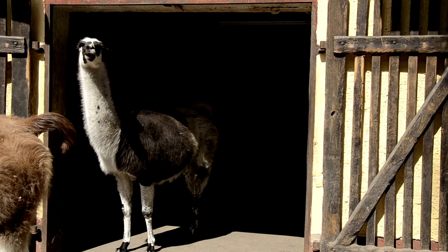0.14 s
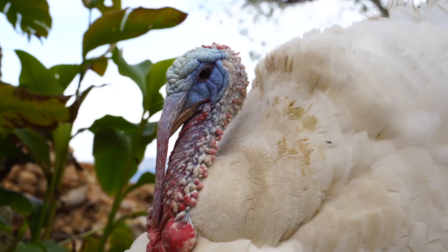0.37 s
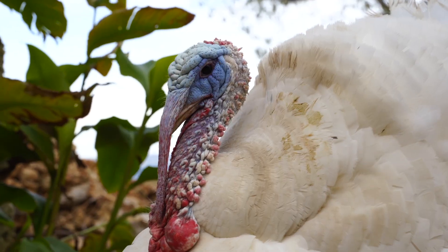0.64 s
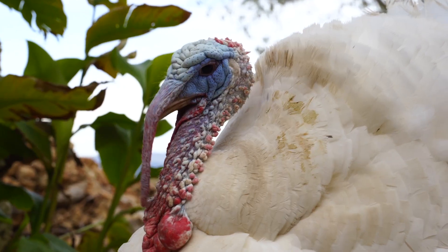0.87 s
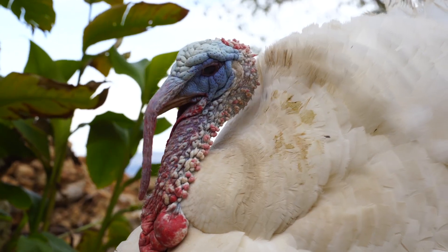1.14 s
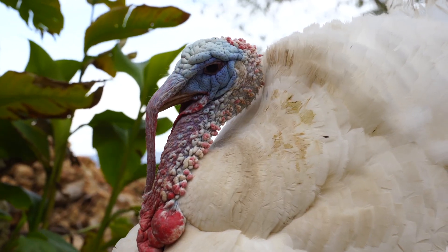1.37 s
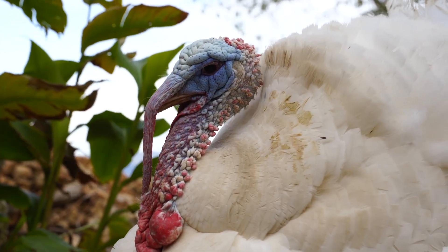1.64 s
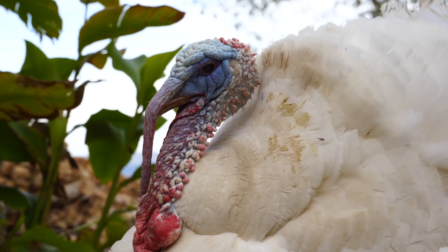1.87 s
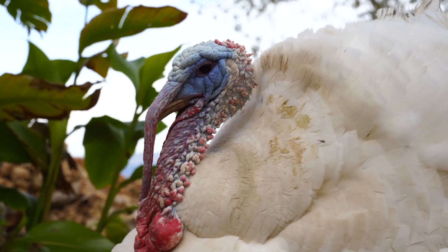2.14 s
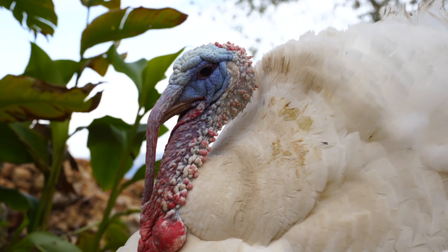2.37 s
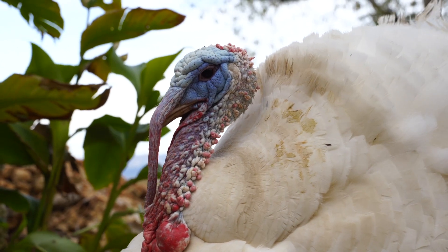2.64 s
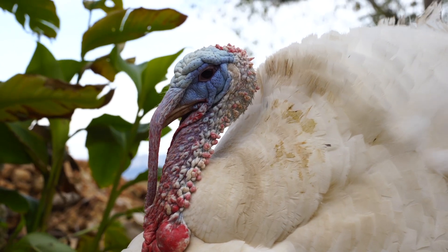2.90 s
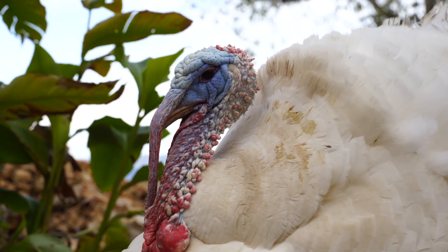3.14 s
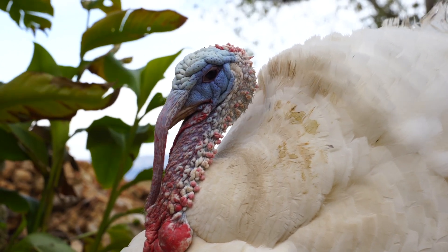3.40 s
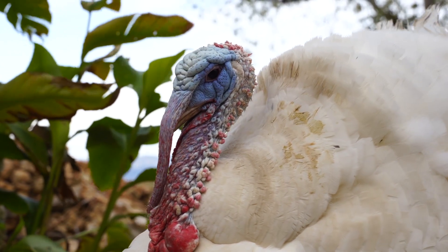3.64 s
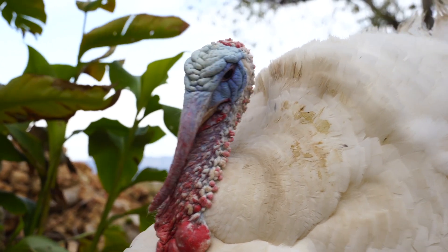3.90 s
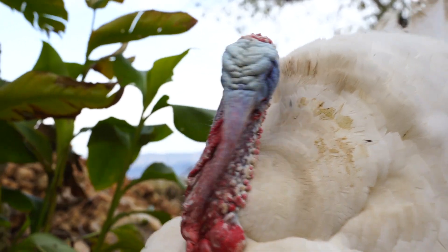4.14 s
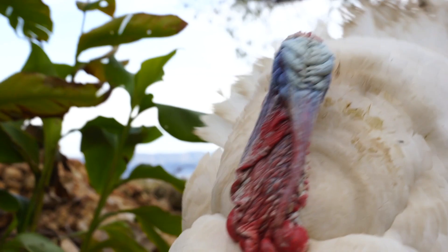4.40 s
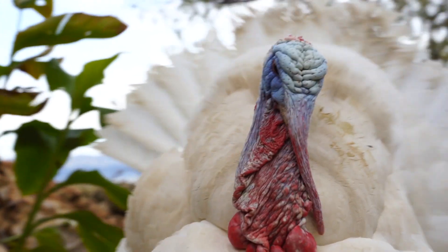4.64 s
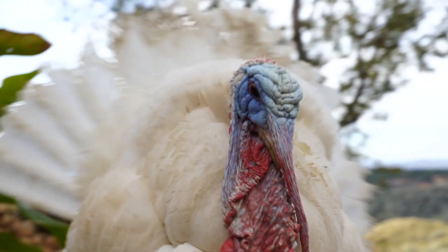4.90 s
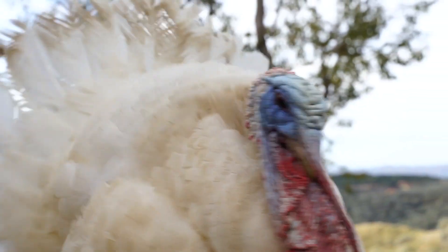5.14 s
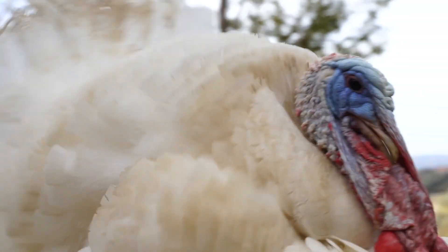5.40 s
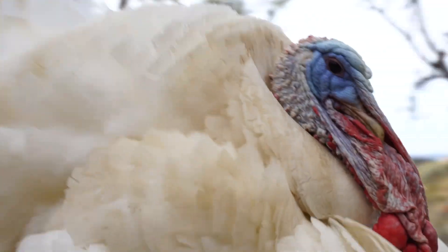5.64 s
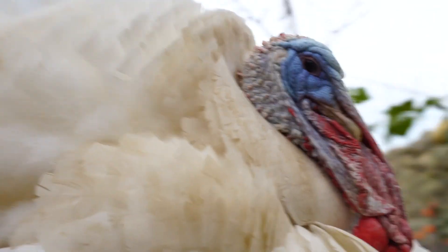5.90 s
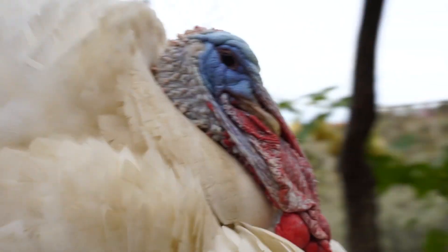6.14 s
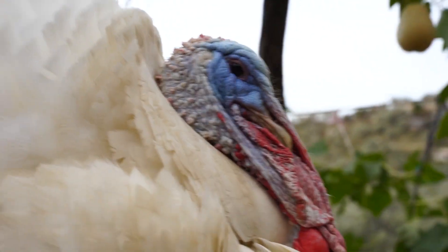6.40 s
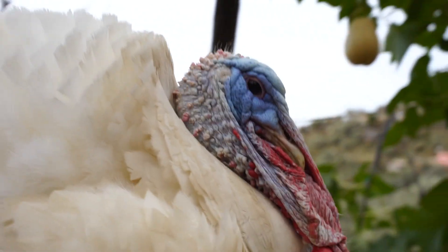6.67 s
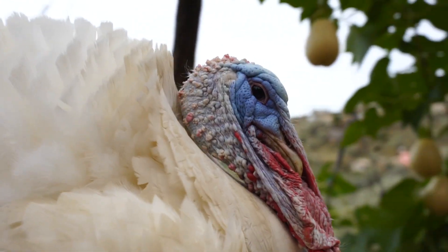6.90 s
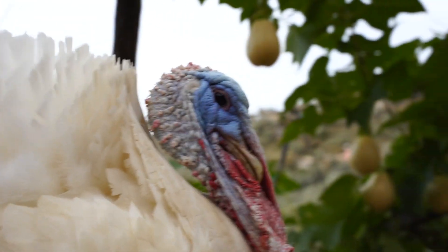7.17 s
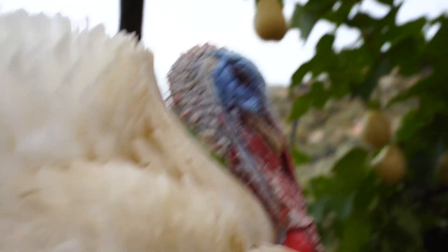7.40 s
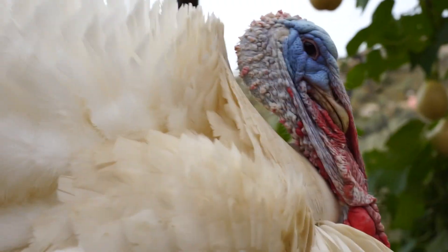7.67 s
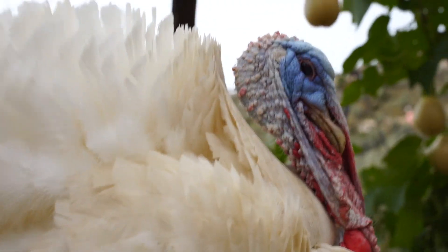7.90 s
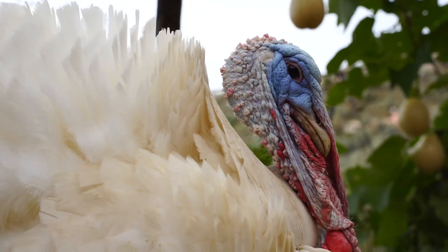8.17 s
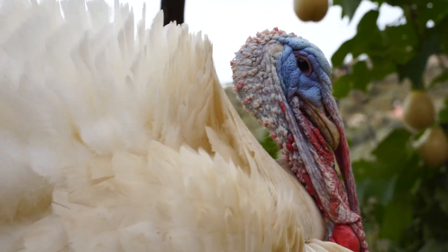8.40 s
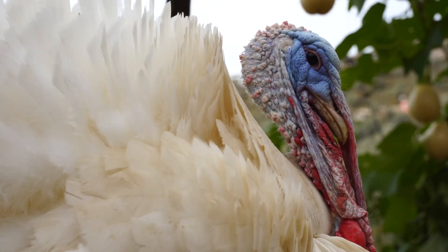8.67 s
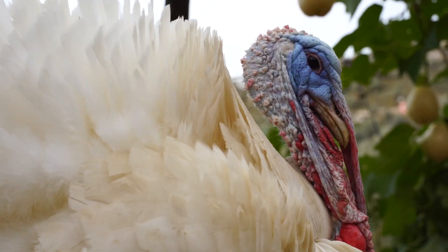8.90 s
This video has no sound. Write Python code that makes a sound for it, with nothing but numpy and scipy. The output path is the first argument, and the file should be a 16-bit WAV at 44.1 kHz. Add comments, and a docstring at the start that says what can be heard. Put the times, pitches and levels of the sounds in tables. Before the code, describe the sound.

Silence lasts until about 0.4 s, when farmyard air fades in quickly with a faint motor hum, distant twittering and a sudden turkey gobble. This bout, the loudest, is a rapid, falling string of rough throaty syllables over a hoarse chorus, ending near 1.75 s. Tiny high bird chips lead into a second, more broken bout from 1.8 to 2.8 s. In the gap, small birds whistle and warble, and a distant fowl rasps around 3.3 s as the low hum swells by 3.9 s. A third gobble runs 3.85 to 4.9 s. Squeaks like a gate hinge throb from 4.7 s, with another far rasp before the fourth bout at 5.9 to 6.9 s. Stronger squeaks come around 6.6 and 7.3 s, continuing to 8 s. A last gobble starts at 8.3 s and runs to about 9 s. Wind booms softly and buffets the microphone throughout.

```python
"""After a short silence, farmyard air fades in with a faint motor hum, wind booming on the microphone and a far
twitter. Turkeys gobble in five bouts: rough, quick harmonic syllables over a hoarse chorus of noise in throat
resonances. Small birds add near-sine chips, phrases and whistles from 1.6 s, a far fowl rasps in two noise
resonances from 3.3 s, the hum swells at about 3.6 s, and from 4.7 s a fowl purrs in throbbing modes."""
import sys
import numpy as np
from scipy import signal
from scipy.io import wavfile
from scipy.ndimage import uniform_filter1d

SR = 44100
rng = np.random.default_rng(int(sys.argv[2]) if len(sys.argv) > 2 else 0)


def natural_amplitude(level_db):
    """Convert a level in decibels to a linear amplitude factor, elementwise."""
    exponent = np.asarray(level_db, float) / 20
    return 10 ** exponent


def inscribe(sig):
    """Save sig as 16-bit PCM at rate SR to the path in sys.argv[1].

    A 1-D sig is mono; a 2-D sig holds one channel per row.
    Samples are clipped to [-1, 1] before scaling.
    """
    pcm = np.round(np.clip(np.atleast_2d(sig).T, -1, 1) * 32767)
    wavfile.write(sys.argv[1], SR, pcm.astype(np.int16))


N = 398663
T = np.arange(N) / SR


def rms_one(x):
    """Scale to unit rms."""
    return x / np.sqrt(np.mean(np.abs(x) ** 2) + 1e-20)


def in_time(tables, fade_s=0.0056):
    """Gate that is open while a table lasts, then the columns of all tables over time."""
    t, *columns = np.transpose(np.concatenate(tables))
    gate = 0
    for table in tables:
        inside_s = np.minimum(T - table[0][0], table[-1][0] - T)
        gate = gate + np.clip(inside_s / fade_s + .5, 0, 1)
    return [np.minimum(gate, 1)] + [np.interp(T, t, c) for c in columns]


def drift(rate_hz, channels=1):
    """Slow chance of rms 1: noise at SR / 4 through a fourfold one-pole low-pass."""
    pole = np.exp(-16 * np.pi * rate_hz / SR)
    sos = [[0.98, 0.0087, 0.015, 1, -2 * pole, pole * pole]] * 2
    settle = 4000
    noise = rng.standard_normal((channels, N // 4 + settle + 2))
    slow = signal.sosfilt(sos, noise)[:, settle:]
    return [np.interp(np.arange(N) / 4, np.arange(len(v)), rms_one(v)) for v in slow]


def resonance(hz, width_hz, clear=0.):
    """Noise heard through a moving resonance, blending to a pure tone as clear goes to 1; rms 1."""
    a, b = drift(width_hz, channels=2)
    clear = np.clip(clear, 0, 1)
    phase = 2 * np.pi * np.cumsum(hz + 0 * T) / SR
    in_phase = np.sqrt(2 * clear) + np.sqrt(1 - clear) * a
    return in_phase * np.sin(phase) + np.sqrt(1 - clear) * b * np.cos(phase)


# background spectrum: [f/Hz, relative density/dB]
AIR_SPECTRUM = [(47, -30), (80, -0.5), (267, -13.5), (427, -11.5), (506, -16.5), (684, -16.5),
                (1200, -27.5), (1370, -25), (2600, -18.5), (2920, -27.5), (7200, -46.5), (9360, -103.5),
                (15800, -120)]


def air(level_db=-40.5, patchy_db=2.0):
    """Third-octave bands of background noise, each flickering on its own."""
    out, white = 0, rng.standard_normal((2, N))
    edges_hz = 80 * 2 ** np.arange(0, 6.9, 1 / 3)
    hz, db = np.transpose(AIR_SPECTRUM)
    for k, (low, high) in enumerate(zip(edges_hz, edges_hz[1:])):
        sos = signal.butter(2, [low, high], "band", fs=SR, output="sos")
        band = signal.sosfilt(sos, white[k % 2])
        band_db = np.interp(np.log(low * high) / 2, np.log(hz), db)
        out = out + natural_amplitude(band_db + patchy_db * drift(38.0)[0]) * band
    return natural_amplitude(level_db) * rms_one(out)


# motor lines at full strength: [f/Hz, width/Hz, level/dB rms]
HUM_LINES = [(285.5, 6.5, -43), (303.8, 4.2, -44), (420.4, 350, -54)]


def motor_hum(start_s=3.43, rise_s=0.46, idle_gain=.3):
    """Motor as three noisy resonances: faint at first, then rising to full strength."""
    hum = sum(natural_amplitude(db) * resonance(hz, width_hz, 0.61) for hz, width_hz, db in HUM_LINES)
    return hum * np.clip((T - start_s) / rise_s, idle_gain, 1)


# gust strength as boom: [t/s, level/dB]
GUSTS = [(0.45, -51), (0.54, -48.5), (1.57, -50.5), (1.91, -31), (3.56, -33.5), (3.8, -48.5), (4.21, -39),
         (5.69, -50), (6.43, -31), (7.51, -37), (7.77, -30), (7.86, -36.5), (9.04, -44.5)]
# brief buffets: [t/s, relative peak level/dB]
BUFFET_HITS = [(4.022, -34), (4.209, -16), (4.753, -20.5), (5.612, -23.5), (5.735, -23), (5.869, -25),
               (6.549, -26.5), (6.806, -44)]


def wind(boom_hz=64.66, boom_hz_per_db=-0.1, usual_db=-35, flutter_db=-42, buffet_s=0.026):
    """Gusts boom on the microphone, lower when stronger, and flutter in lumps above the boom."""
    _, db = in_time([GUSTS])
    hz = boom_hz + boom_hz_per_db * (db - usual_db)
    boom = natural_amplitude(db) * (natural_amplitude(0.5) * resonance(hz, 18.4) + natural_amplitude(-2.0) * resonance(hz, 60))
    buffets = sum(natural_amplitude(peak_db - 12) * np.exp(-((T - t - buffet_s) / buffet_s) ** 2)
                  for t, peak_db in BUFFET_HITS)
    flutter = natural_amplitude(flutter_db + 2.9 * drift(12)[0])
    return boom + (flutter + buffets) * resonance(165, 90)


# distant flock of small birds: [t/s, relative level/dB]
FLOCK_LEVEL = [(0.42, -42), (0.5, -42), (4.23, -38.5), (5.83, -44.5), (6.17, -39), (7.7, -37),
               (9.04, -56.5)]
# its bands: [f/Hz, width/Hz, relative level/dB]
FLOCK_BANDS = [(2700, 42, 1), (2519, 72, 1.5), (2390, 19, -17), (1995, 510, -8.5), (3350, 200, -18),
               (3800, 160, -16.5), (6850, 100, -27)]


def twitter():
    """Far flock blurred into half-tonal bands that wander and swell."""
    out = np.zeros(N)
    _, db = in_time([FLOCK_LEVEL])
    for hz, width_hz, band_db in FLOCK_BANDS:
        wander, swell = drift(6.4, channels=2)
        gain = natural_amplitude(db + band_db - 5.5 + 4.3 * swell)
        out += gain * resonance(hz * (1 + 0.0089 * wander), width_hz, 0.5)
    return out


# bouts, one list per leading bird:
# [t/s, length/s, relative peak level/dB, level lost by the end/dB, opening pitch/Hz]
GOBBLE_BOUTS = [
    [(.43, 1.323, -20, 12.5, 630.4)],
    [(1.841, 0.96, -22.5, 4, 638.4)],
    [(3.85, 1.075, -24, 12.5, 672.6), (5.86, 1.02, -25, -1.5, 670), (8.3, 0.84, -26, 3.5, 647)],
]
# throat per bird: [middle f/Hz at start, at peak, at end, high f/Hz at peak, low level/dB,
# brightness/dB, high level/dB at end, dip in pauses/dB]
BIRD_THROATS = [(1315, 1030, 910, 1660, -14, -16, -1.8, -6.5), (1200, 1100, 1020, 1850, -1, -9, -13, -0.5),
                (1240, 1140, 1040, 1850, -0.5, -6, 1.5, -3)]


def bout_curves():
    """Per bout, rows at start, peak, end: s, dB, voice/middle/high Hz, low/bright/high/dip dB."""
    swell_s, swell_db, dull_start_db, tired_db = .22, 9, 13, 2  # swells and brightens to the peak
    sag_hz_per_s = 95
    high_sag = 0.034  # high resonance sits lower at start and end
    low_lingers = 0.64  # share of the lost level that the low resonance keeps
    curves = []
    for bouts, throat in zip(GOBBLE_BOUTS, BIRD_THROATS):
        first, peak, last, high, low_db, bright_db, high_db, dip_db = throat
        edge_high = high * (1 - high_sag)
        for t, length, db, lost_db, hz in bouts:
            curves.append([
                (t, db - swell_db, hz, first, edge_high, low_db, bright_db - dull_start_db, 0, dip_db),
                (t + swell_s, db, hz - sag_hz_per_s * swell_s, peak, high,
                 low_db, bright_db, .5 * high_db, dip_db),
                (t + length, db - lost_db, hz - sag_hz_per_s * length, last, edge_high,
                 low_db + low_lingers * lost_db, bright_db - tired_db, high_db, dip_db)])
    return curves


# near gobbler's syllables: [t/s, relative peak level/dB, loudest resonance f/Hz, brightness/dB, length/s]
GOBBLES = [(0.421, -6.5, 1390, -26.5, 0.0306), (.42, -23, 3400, -68, 0.055), (0.461, 4, 1518, -34.5, 0.06),
           (0.516, -1.5, 1516, -51, 0.023), (0.468, -5, 1200, -51, .045), (.548, -8.5, 1013, -47, 0.017),
           (0.529, 4.5, 1170, -40, 0.035), (0.524, -4, 1890, -61.5, 0.035),
           (0.583, -15.5, 1260, -57, 0.0938), (0.67, -5, 1216, -42, 0.027), (0.714, -2.5, 1003, -51, 0.014),
           (0.783, -19, 990, -65, 0.0339), (0.854, 0, 950, -32, 0.023), (0.888, -10.5, 1668, -31, 0.033),
           (0.908, -18, 990, -34, 0.017), (0.972, -8.5, 952, -11.5, 0.0391), (1.02, -4.5, 908, -20, 0.018),
           (1.055, -30, 1014, -29, 0.0421), (1.127, -6.5, 999, -12, 0.027), (1.205, -25, 958, -3, 0.0799),
           (1.281, -5.5, 934, -15.5, 0.024), (1.323, -7.5, 832, -29, 0.014), (1.377, -27, 920, -34, 0.0725),
           (1.464, -6, 863, -15.5, 0.014), (1.844, -13, 2120, -10.5, 0.04), (1.847, -13, 1640, -30, .05),
           (1.847, -12, 587, -38, .035), (1.892, -6.5, 1318, -17, 0.073), (1.919, -3, 837, -27, 0.024),
           (1.982, -2, 568, -31, 0.02), (2.019, -6.5, 1742, -14, 0.044), (2.044, -10.5, 982, -8, 0.049),
           (2.075, -7, 1214, -12, 0.049), (2.09, -7.5, 650.3, -16, 0.075), (2.18, -7, 1052, -7.5, 0.035),
           (2.223, -8.5, 1072, -7.5, 0.064), (2.257, -11.5, 600, -7, 0.0883),
           (2.341, -9.5, 1097, -21, 0.0434), (2.382, -5, 1083, -36, 0.016), (2.398, -5, 1110, -30, 0.04),
           (2.427, -7, 973, -25, 0.0515), (2.515, -9.5, 1092, -46, 0.066), (2.558, -10.5, 870, -19, 0.013),
           (2.586, -23, 577, -28, 0.03), (2.631, -10, 615, -17, 0.0463), (2.693, -22, 595, -26, 0.033),
           (2.761, -1.5, 1004, -26, 0.011), (2.864, -8.5, 565, -24, 0.0515),
           (3.873, -2.5, 1355, -14.5, 0.04), (3.923, -7.5, 1283, -12, 0.023), (3.999, -8, 1120, -53, 0.031),
           (4.033, 1, 1362, -13.5, 0.0419), (4.122, -13, 1940, -40, 0.012),
           (4.142, -15, 1889, -38.5, 0.041), (4.228, -9.5, 1830, -38, 0.069),
           (4.18, -9.5, 1347, -18.5, 0.03), (4.241, -15.5, 1455, 12.5, 0.0365),
           (4.291, -8.5, 1850, -15.5, 0.021), (4.319, -15, 1041, -8.5, 0.0983),
           (4.405, -9.5, 1748, 0, 0.028), (4.492, -9, 1017, -46, 0.015), (4.567, -8.5, 1730, -6, 0.037),
           (4.72, -21, 1840, -37, 0.029), (5.851, -16.5, 820, -58, 0.04), (6.004, -8.5, 1863, -31.5, 0.063),
           (6.006, -3, 1236, 2, 0.025), (6.098, -7, 1257, -45.5, 0.033), (6.169, -11, 1052, -6.5, 0.043),
           (6.247, -4.5, 1763, -60, 0.025), (6.315, 0, 1880, -21.5, 0.028), (6.328, 0, 1268, -7, 0.045),
           (6.423, -10.5, 591.5, -5.5, 0.048), (6.572, -10, 1520, 3.5, 0.025),
           (8.318, -10, 1240, -16.5, 0.053), (8.348, -7, 1223, -41, 0.025), (8.379, -10.5, 649, -25, 0.044),
           (8.434, -7.5, 1322, -13.5, 0.027), (8.457, -21, 778, -6, 0.056), (8.51, 0, 1340, -35, 0.017),
           (8.543, -6, 611.4, -31, 0.014), (8.588, -31, 1090, -28, 0.012), (8.633, -10.5, 1850, -38, 0.043),
           (8.687, -29, 1590, 17.5, 0.0051), (8.718, -9.5, 1850, -12, 0.024),
           (8.738, -14.5, 1397, 5.5, 0.035), (8.805, -11.5, 1026, -20, 0.03),
           (8.844, -12, 1850, -35, 0.043), (8.85, -11, 603, -31, 0.048), (8.887, -15, 1800, 0, 0.048)]
# sliding syllables: [t/s, share of pitch gained over the syllable]
PITCH_SLIDES = [(.531, -0.052), (1.919, -0.18), (2.045, -0.13), (2.098, 0.069), (2.379, 0.089),
                (2.427, -0.103), (2.591, 0.087), (2.706, -0.15), (2.869, -0.16), (4.032, 0.18),
                (5.851, -0.22), (6.248, 0.04), (6.313, 0.26), (6.327, .1), (8.314, -0.049), (8.352, -0.088),
                (8.432, 0.095), (8.509, 0.1)]


def gobbler(rough=.18, rough_hz=60, effort_db_per_db=0.5, rasp_db=-8.5, voice_db=-10, tilt_db=-3,
            glide=.18, arch_top=0.498, attack=0.18, fall=2.63, puff_db=-16.5):
    """Harmonic voice with arching pitch and one strong resonance, roughened by airflow, plus a puff."""
    lock_below, lock_above = .2, .3  # resonance this near a voice harmonic pulls the pitch onto it
    treble_hz, bright_hz, bright_db_per_khz = 2300, 3400, -16.5  # treble harmonics peak at bright_hz
    bright_at, bright_span = 0.54, 0.59  # shares of a syllable
    out = np.zeros(N)
    rough_level, rough_phase, rough_voice = drift(rough_hz, channels=3)
    hoarse_sin, hoarse_cos = drift(210, channels=2)
    _, _, voice_hz, _, _, low_db, _, high_db, _ = in_time(bout_curves())
    sos = signal.butter(2, [1500, 5500], "band", fs=SR, output="sos")
    puff = rms_one(signal.sosfilt(sos, rng.standard_normal(N)))

    onsets = np.array(GOBBLES)[:, 0]
    slides = np.zeros(len(GOBBLES))
    for t, share in PITCH_SLIDES:
        slides[np.argmin(np.abs(onsets - t))] = share

    for (t, db, loud_hz, bright_db, length), slide in zip(GOBBLES, slides):
        length = max(length, .006)
        i = slice(round((t - .008) * SR), round((t + 2 * length) * SR))
        pitch = voice_hz[i.start]
        nearest = round(loud_hz / pitch)
        if -lock_below < loud_hz / pitch - nearest < lock_above:
            pitch = loud_hz / nearest
        u = np.maximum(T[i] - t + 0.0054, 0) / length
        shape = (1 - np.exp(-(u / attack) ** 2)) * np.exp(-(1.044 * u) ** fall)
        bend = 1 + glide * (.15 - (u - arch_top) ** 2) + slide * (u - .5)
        turn = 2 * np.pi * np.cumsum(bend) / SR  # phase per Hz
        treble = np.exp(-((u - bright_at) / bright_span) ** 2) / (shape + 0.17)  # opens mid-syllable

        tone = (1 + rough * rough_level[i]) * np.sin(loud_hz * turn + rough * rough_phase[i])
        # harder calls break into a wide rasp
        rasp = hoarse_sin[i] * np.sin(loud_hz * turn) + hoarse_cos[i] * np.cos(loud_hz * turn)
        tone += natural_amplitude(effort_db_per_db * db + rasp_db) * rasp
        for k in range(1, 10):
            hz = k * pitch
            if k == 1:
                level_db = low_db[i] - 17.5
            elif hz < treble_hz:
                level_db = voice_db + tilt_db * (k - 2) + high_db[i] * (k > 2)
            else:
                level_db = bright_db + bright_db_per_khz * abs(hz - bright_hz) / 1000
            opening = 1 if hz < treble_hz else treble
            phase = k * (pitch * turn + rough * rough_level[i] / 3) + k * k
            tone += natural_amplitude(level_db) * opening * (1 + rough * rough_voice[i]) * np.sin(phase)
        breath = natural_amplitude(puff_db + .5 * bright_db + 0.0) * treble * puff[i]
        out[i] += natural_amplitude(db - 9.5) * shape * (tone + breath)
    return out


# chorus resonances low, middle, high, above-middle: [width/Hz, relative level/dB, share of pitch wobble]
CHORUS_THROATS = [(55, 3, .05), (80, 0, .06), (45, -3, .025), (70, -8, .03)]
# upper resonances, not following the bouts' pitch: [f/Hz, width/Hz, relative level/dB]
CHORUS_UPPER = [(2192, 180, 1), (3074, 82, -2.5), (3500, 44, -3), (3670, 110, -11), (4000, 480, -9),
                (5510, 1300, -16), (6930, 180, -25.5)]


def chorus(clear=.5, lumpy_db=3.5, lump_hz=22, pause_s=0.04, throb_hz=43.8, throb=0.33, pitch_fall=.08):
    """Overlapping gobbles blur into lumpy noise in sinking, wobbling throats, dipping in pauses."""
    gate, db, low, middle, high, low_db, bright_db, high_db, gap_db = in_time(bout_curves(), fade_s=0.043)
    lumps, bends = drift(lump_hz, channels=5), drift(18, channels=4)
    top = 0
    for hz, width_hz, top_db in CHORUS_UPPER:
        gain = natural_amplitude(top_db + 3.5 * drift(12)[0])
        moving_hz = hz * (1 + .025 * drift(10)[0])
        top = top + gain * resonance(moving_hz, width_hz, clear * (width_hz < 200))

    onsets, lengths = np.transpose(sorted(GOBBLES))[[0, 4]]
    last = np.maximum(np.searchsorted(onsets, T) - 1, 0)
    since_s = T - np.maximum.accumulate(onsets + lengths)[last]
    progress = np.clip((T - onsets[last]) / lengths[last], 0, 1)
    sweep = 1 + pitch_fall * uniform_filter1d(.5 - progress, size=200)
    centres = low * sweep, middle * sweep, high, 1.25 * middle * sweep
    parts = [natural_amplitude(part_db + lumpy_db * lump) * resonance(hz * (1 + wobble * bend), width_hz, clear)
             for hz, (width_hz, part_db, wobble), lump, bend in zip(centres, CHORUS_THROATS, lumps, bends)]

    beat_hz = throb_hz * (1 + 0.1005 * lumps[4])
    beat = 1 + throb * np.cos(2 * np.pi * np.cumsum(beat_hz) / SR)
    pause_db = gap_db * uniform_filter1d(np.clip(since_s / pause_s, 0, 1) ** 2, size=300)
    blur = natural_amplitude(low_db) * parts[0] + beat * parts[1] + natural_amplitude(high_db) * parts[2] + parts[3]
    blur += natural_amplitude(bright_db + .5 * pause_db + lumpy_db * lumps[4]) * top
    return gate * natural_amplitude(db - 4.0 + pause_db) * blur


# gobblers catch their breath: [t/s, length/s, level lost/dB]
BREATH_DIPS = [(0.504, 0.0074, 9), (1.956, 0.041, 5.5), (2.004, 0.019, 2.5), (2.144, 0.047, 4.5),
               (2.208, 0.0078, 4), (2.306, 0.027, 6.5), (2.367, 0.012, 2), (2.464, 0.041, 8),
               (2.54, 0.0087, 3), (2.566, 0.03, 8.5), (2.683, 0.025, 13), (2.738, 0.022, 6.5),
               (2.763, 0.1065, 12), (3.963, 0.05, 3.5), (4.067, 0.045, 7), (8.388, 0.041, 6),
               (8.612, 0.028, 5), (8.758, 0.021, 5.5), (8.928, 0.11, 10)]


def breathing(edge_s=0.0066):
    """Gain of the gobblers' voices: it drops during each breath."""
    lost_db = sum(db * np.clip(np.minimum(T - t, t + length - T) / edge_s + .5, 0, 1)
                  for t, length, db in BREATH_DIPS)
    return natural_amplitude(-lost_db)


# short falling chips: [t/s, f/Hz, relative level/dB]
BIRD_CHIPS = [(1.63, 3680, -52), (1.704, 4000, -48), (1.785, 4000, -40), (1.87, 3960, -36),
              (3.14, 4130, -59), (3.321, 4530, -57), (3.349, 4850, -50), (3.44, 4700, -53),
              (3.685, 4670, -51), (1.955, 4020, -38.5), (3.7, 3800, -58), (3.75, 3740, -58)]
# far warbler's phrases: [t/s, f/Hz, relative level/dB]
WARBLER_PHRASES = [(2.514, 2405, -39), (2.792, 2393, -42.5), (3.077, 2454, -42), (3.3, 2394, -42.5),
                   (3.58, 2390, -46), (6.779, 2420, -52)]
# single whistles: [t/s, length/s, from f/Hz, to f/Hz, relative level/dB]
BIRD_WHISTLES = [(1.672, 0.033, 5950, 6440, -53), (1.695, 0.065, 2700, 2740, -41.5),
                 (1.748, 0.046, 5580, 6150, -47), (1.832, 0.064, 5500, 6240, -48.5),
                 (3.03, 0.085, 2100, 2000, -43), (2.88, 0.1, 2310, 2060, -40),
                 (3.27, 0.083, 5270, 5130, -53), (3.37, 0.18, 5030, 5020, -52),
                 (3.0, 0.073, 2350, 2270, -40), (3.79, 0.086, 4886, 3910, -55.5),
                 (5.44, 0.086, 3270, 3450, -44.5), (5.584, 0.15, 2120, 2324, -45.5),
                 (5.69, 0.025, 2660, 2980, -43), (5.83, 0.087, 3180, 3510, -45),
                 (7.166, 0.13, 2400, 2300, -42.5), (8.957, 0.1, 2630, 2700, -45)]


def bird_notes():
    """All notes as (t/s, length/s, from f/Hz, to f/Hz, relative level/dB)."""
    chip_s, chip_fall = 0.037, 0.12  # falls and rises are shares of pitch
    note_s, note_sag, flick_s, flick_rise = 0.15, 0.033, 0.0738, .07
    notes = BIRD_WHISTLES + [(t, chip_s, hz, hz * (1 - chip_fall), db) for t, hz, db in BIRD_CHIPS]
    for t, hz, db in WARBLER_PHRASES:  # a sagging note, then an upward flick
        notes += [(t, note_s, hz, hz * (1 - note_sag), db),
                  (t + note_s - .01, flick_s, hz * (1 - note_sag / 2), hz * (1 + flick_rise), db)]
    return notes


def small_birds():
    """Gliding near-sine notes, fluttering in level and wavering in pitch."""
    out, (flutter, waver) = np.zeros(N), drift(42, channels=2)
    for t, length, from_hz, to_hz, db in bird_notes():
        i = slice(round(t * SR), min(round((t + length) * SR), N))
        u = np.clip((T[i] - t) / length, 0, 1)
        hz = (to_hz + (from_hz - to_hz) * (1 - u)) * (1 + 0.012 * waver[i])
        level = natural_amplitude(db + 7) * (1 + 0.6 * flutter[i]) * np.sin(np.pi * u) ** .5
        out[i] += level * np.sin(2 * np.pi * np.cumsum(hz) / SR)
    return out


# far fowl, one list per call: [t/s, relative level/dB, lower resonance f/Hz, upper resonance f/Hz]
FOWL_CALLS = [
    [(3.3, -45, 1372, 1650), (3.36, -27.5, 1366, 1820), (3.8, -45, 1430, 1610)],
    [(4.85, -31, 1220, 1713), (5.408, -28, 1290, 1640), (5.5, -63, 1090, 1600)],
]


def rasps():
    """A hoarse call, far away: noise in two broad moving resonances."""
    gate, db, lower_hz, upper_hz = in_time(FOWL_CALLS, fade_s=0.037)
    return gate * natural_amplitude(db - 10.0) * (resonance(lower_hz, 83) + resonance(upper_hz, 150))


# purring fowl's throat modes: [f/Hz, width/Hz, relative level in rolls/dB]
PURR_MODES = [(584, 35, -7.5), (735, 89, -1.5), (830, 17, 0.5), (918, 9.8, -6.5), (977, 13, -4.5),
              (1135, 110, 2.5), (1225, 82, -2.5), (1272, 28, -11.5), (1452, 490, -2.5), (1850, 310, -10.5)]
# purring rolls, all modes ringing: [t/s, length/s, relative level/dB, t of one pulse/s, pulse rate/Hz]
PURR_ROLLS = [(4.804, 0.33, -39, 4.989, 37), (5.277, 0.28, -41.5, 5.5, 38), (5.5, .3, -40, 5.44, 36.5),
              (6.484, 0.25, -36, 6.6, 33), (7.044, 0.4, -41.5, 7.234, 37.2),
              (7.585, 0.28, -43.5, 7.4, 45), (7.852, 0.14, -37, 7.915, 48)]
# purred notes: [t/s, length/s, favoured f/Hz, relative level/dB]
PURR_NOTES = [(4.735, 0.11, 1135, -28.5), (4.832, 0.084, 1135, -40), (4.854, 0.17, 735, -36),
              (4.906, 0.034, 1135, -27), (4.938, 0.14, 977, -29.5), (5.094, 0.034, 1135, -31),
              (5.115, 0.037, 830, -34), (5.279, 0.12, 570.5, -29.5), (5.344, 0.11, 1135, -41.5),
              (5.517, 0.052, 1135, -30), (5.57, 0.1, 977, -28.5), (5.736, 0.042, 977, -31.5),
              (5.673, 0.125, 1135, -36), (6.567, 0.073, 977, -25), (6.635, 0.029, 977, -14.5),
              (6.69, 0.15, 1272, -16.5), (6.837, 0.018, 1225, -38), (6.94, 0.12, 830, -42),
              (7.131, 0.12, 977, -26.5), (7.236, 0.088, 1225, -31), (7.286, .075, 1167, -19),
              (7.22, 0.12, 592, -38), (7.341, 0.052, 830, -24.5), (7.419, 0.071, 918, -42),
              (7.5, 0.095, 918, -46.5), (7.665, 0.21, 599.8, -29.5), (7.666, 0.15, 1272, -25),
              (7.822, 0.07, 1272, -27), (7.972, 0.075, 1272, -23.5)]


def purring(spread=0.022, clear=.85, edge_s=0.015):
    """Pulses throb through all modes in a roll; in a note the mode at the favoured pitch sings."""
    roll_throb, roll_edge = .85, 0.13  # depth 0-1; share of a roll spent rising or falling
    steady_db, throb_per_db = -20, .075  # notes throb deeper the further under steady_db
    full_throb_hz = 760  # lower modes ring on between pulses and throb less
    mode_wander, waver_db, grit_share = .012, 2.5, .22
    count = len(PURR_MODES)
    starts, pulses, rates = np.transpose(PURR_ROLLS)[[0, 3, 4]]
    roll = np.maximum(np.searchsorted(starts, T) - 1, 0)
    beat = np.cos(2 * np.pi * rates[roll] * (T - pulses[roll]) + .3 * drift(10)[0])
    grit = np.sqrt(1 - grit_share) + np.sqrt(grit_share) * np.array(drift(45, channels=count))
    waver = waver_db * np.array(drift(5.85, channels=count))
    modes = [resonance(hz * (1 + mode_wander * drift(9.11)[0]), width_hz, clear)
             for hz, width_hz, _ in PURR_MODES]
    roll_shares = [natural_amplitude(db + v) * n for (_, _, db), v, n in zip(PURR_MODES, waver, grit)]

    strokes = [(t, length, db, roll_throb, roll_edge * length, roll_shares)
               for t, length, db, *_ in PURR_ROLLS]
    for t, length, favoured_hz, db in PURR_NOTES:
        shares = [np.exp(-(np.log(favoured_hz / hz) / spread) ** 2) + 0 * T for hz, _, _ in PURR_MODES]
        strokes.append((t, length, db, throb_per_db * (steady_db - db), edge_s, shares))

    out = np.zeros(N)
    for t, length, db, depth, rise_s, shares in strokes:
        i = slice(round(t * SR), round((t + length) * SR))
        edges = np.clip(np.minimum(T[i] - t, t + length - T[i]) / rise_s, 0, 1)
        ringing = 0
        for share, mode, (hz, _, _) in zip(shares, modes, PURR_MODES):
            throb = 1 + np.clip(depth, 0, 1) * beat[i] * min(hz / full_throb_hz, 1) ** 2
            ringing = ringing + throb * share[i] * mode[i]
        out[i] += natural_amplitude(db) * edges * ringing
    return out


def yard(x, echo_db=-20, t60_s=.17):
    """Walls and ground give a short, dull, scattered tail."""
    t = T[:int(.3 * SR)]
    dull = signal.lfilter([1], [1, -.6], rng.standard_normal(len(t)))
    tail = dull * natural_amplitude(-60 * t / t60_s) * (t > .006)
    return x + natural_amplitude(echo_db) * signal.fftconvolve(x, tail / np.linalg.norm(tail))[:N]


def scene():
    """All sources, fading in after the silence."""
    start_s, fade_s = 0.385, 0.063
    breath = breathing()
    echoing = yard(twitter() + breath * gobbler() + small_birds() + purring())
    mix = air() + motor_hum() + wind() + echoing + breath * chorus() + rasps()
    return (mix * np.clip((T - start_s) / fade_s, 0, 1) ** 2)[None]


def suppress(x, share=0.047, least_db=-14):
    """Noise suppressor: bins weak against their neighbourhood in time and pitch are turned down."""
    z = signal.stft(x, nperseg=1024, noverlap=768)[2]
    power = uniform_filter1d(np.abs(z) ** 2, size=5, axis=-1) + 1e-18
    around = uniform_filter1d(uniform_filter1d(power, size=31, axis=-2), size=15, axis=-1)
    gain = np.sqrt(np.clip(1 - share * around / power, natural_amplitude(2 * least_db), 1))
    return signal.istft(z * gain, nperseg=1024, noverlap=768)[1][..., :N]


def low_pass(x):
    """Removes everything above the highest recorded frequency."""
    return signal.sosfilt(signal.butter(12, 7470, fs=SR, output="sos"), x)


def record(dry):
    """Sub-bass is cut, weak noise suppressed, the top cut steeply, peaks rounded."""
    stop_hz, overload, knee = 7420, .97, 10
    x = signal.sosfilt(signal.butter(2, 32, "high", fs=SR, output="sos"), dry)
    x = suppress(x)
    x = signal.sosfilt(signal.cheby2(18, 60, stop_hz, fs=SR, output="sos"), x)
    rounded = x / (1 + np.abs(x / overload) ** knee) ** (1 / knee)
    return low_pass(rounded)


dry = scene()
out = record(dry)
inscribe(out)
```